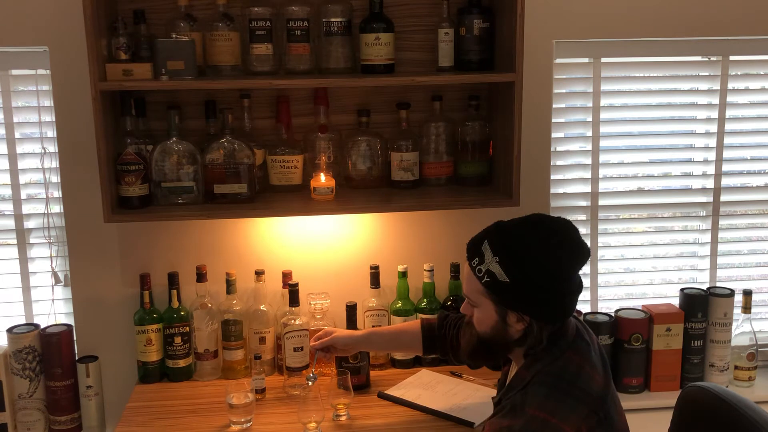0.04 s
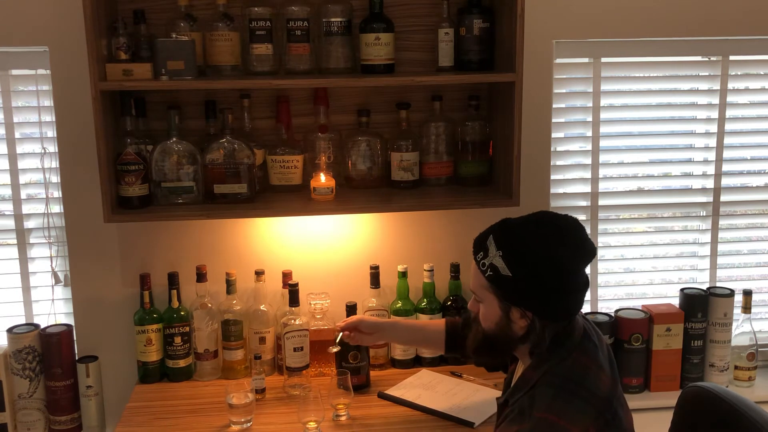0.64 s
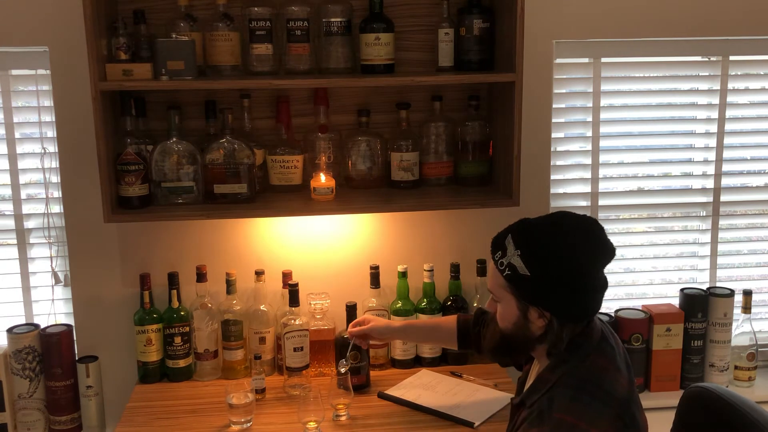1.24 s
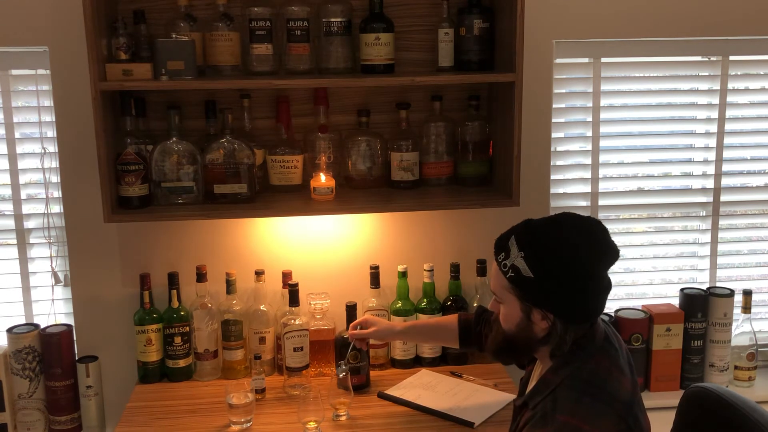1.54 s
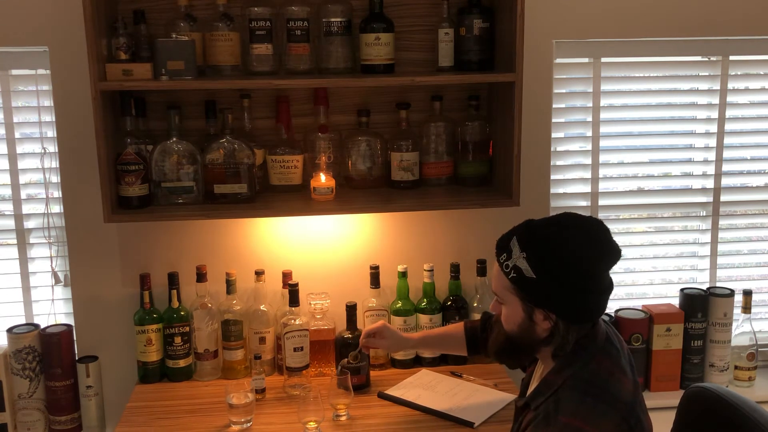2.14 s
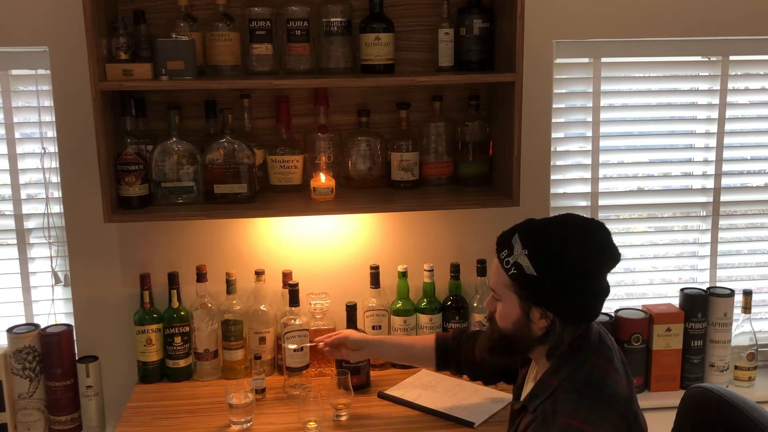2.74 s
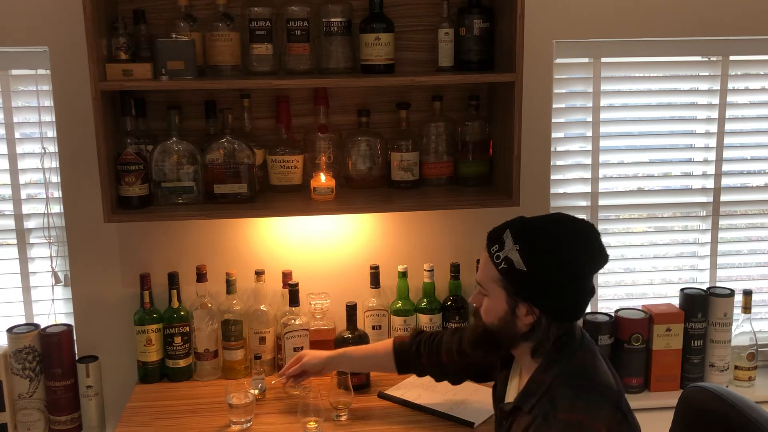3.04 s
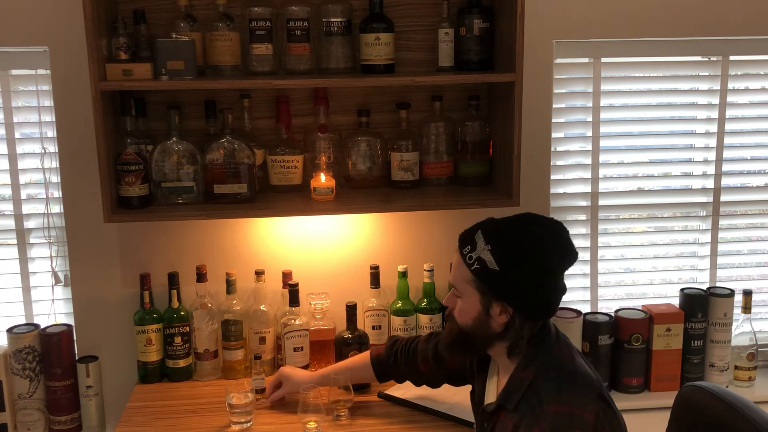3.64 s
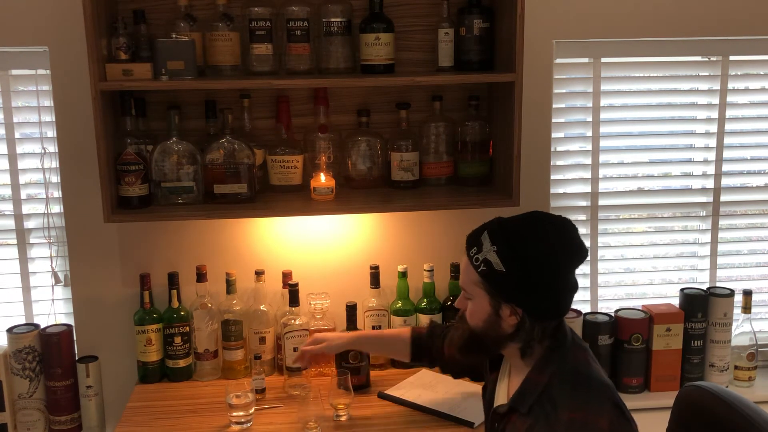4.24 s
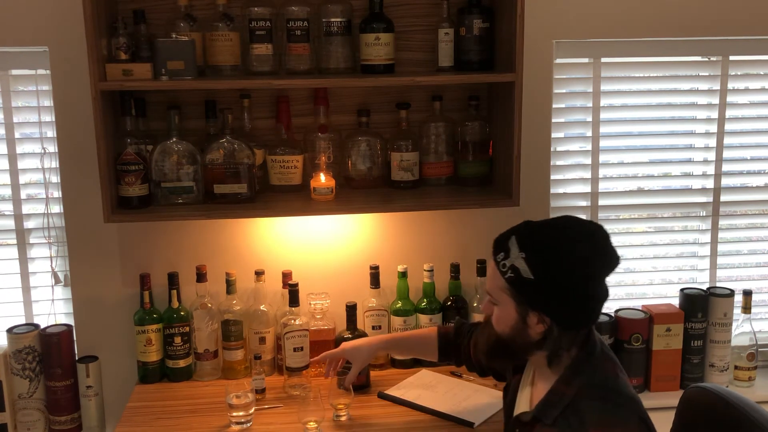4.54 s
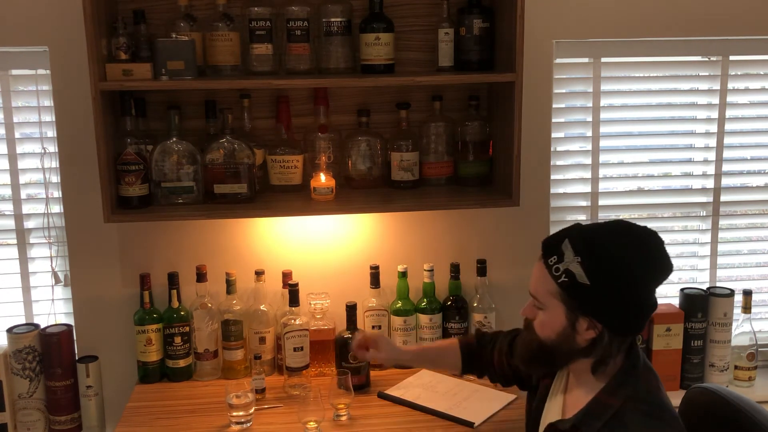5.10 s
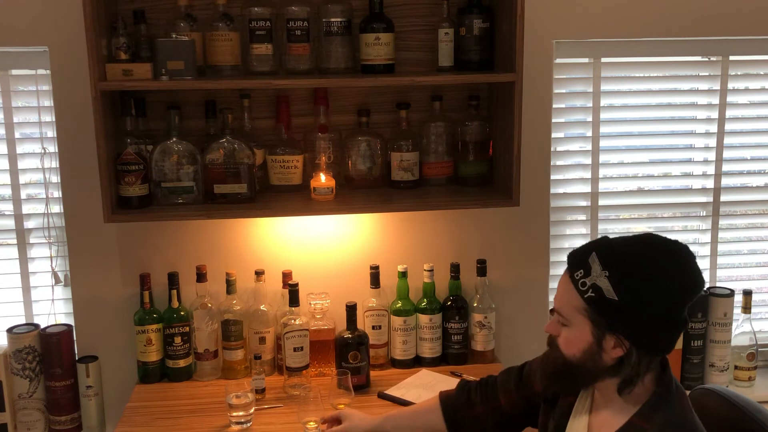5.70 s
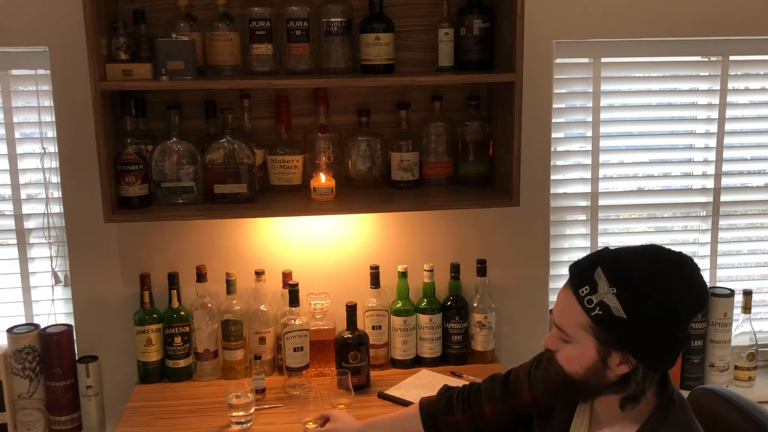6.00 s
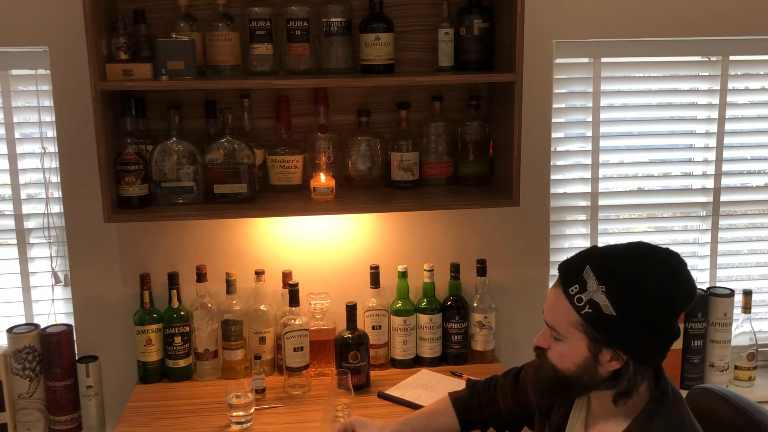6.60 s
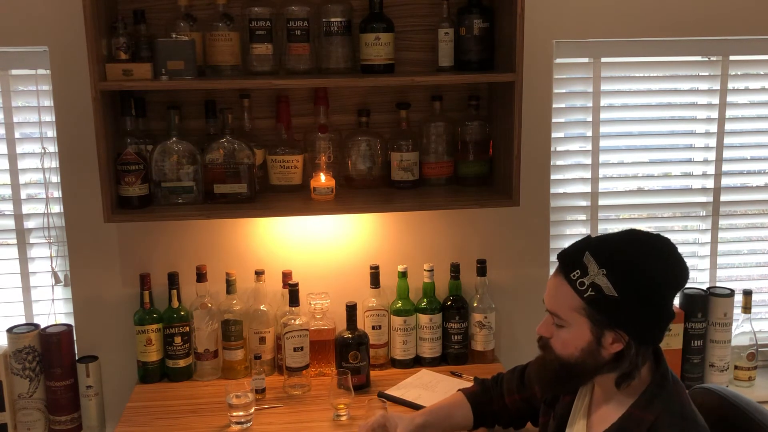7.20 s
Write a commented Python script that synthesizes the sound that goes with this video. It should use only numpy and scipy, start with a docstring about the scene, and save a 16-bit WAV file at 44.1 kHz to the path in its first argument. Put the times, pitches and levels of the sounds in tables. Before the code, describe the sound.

A few light ticks of a dropper against glass open the first 0.3 seconds, over the faint hush and low hum of a small room. At about 1.6 seconds a tasting glass clinks sharply, and its foot clacks onto a wooden table just after. Two more clinks come close together at 2.3 and 2.4 seconds, the first the strongest, leaving a clear ringing tone that gently swells and sinks as it fades. Under it the dropper is put down with two taps, at 3.4 and 4 seconds, with a brief, thin, high ring. At 4.7 seconds a hand stops the note, and glasses land with two dull clacks and wooden thuds, the second at 4.9. Further knocks follow at 5.7 and 6.5 seconds, with soft touches at 6.3 and 7.1. Everything is heard from across the table, with short room reverberation.

```python
"""Tasting glasses on a wooden table in a small, quiet room. A dropper ticks lightly, then a glass is
clinked three times and its bowl sings on in close pairs of modes. Under the long note the dropper is
put down with two taps, its thin tube ringing high. A hand closes round the glass and stops the note.
Glasses are moved and set down, their feet clacking and the wood thudding, and a few last knocks and
ticks sound over the hush of the house."""
import sys
import numpy as np
from scipy import signal
from scipy.fft import rfft, irfft
from scipy.io import wavfile

SR = 44100
rng = np.random.default_rng(int(sys.argv[2]) if len(sys.argv) > 2 else 0)


def dump_mix(stems):
    """Bounce the given channels to the path in sys.argv[1] as a 16-bit WAV at rate SR."""
    frames = np.atleast_2d(stems).T  # one column per channel
    limited = np.clip(frames, -1, 1)  # hard clip at full scale
    pcm = np.round(limited * 32767).astype(np.int16)
    wavfile.write(sys.argv[1], SR, pcm)


N = 328721
TIME = np.arange(N) / SR
BURST_TIME = TIME[:SR * 3 // 4]

# bowl of the glass, its lowest bending modes in close pairs:
# (pitch [Hz], relative level [dB], free ring t60 [s], pair member [-1 lower, +1 upper, 0 neither])
BOWL_MODES = [(1400.4, -6, 2.6, -1), (1443.1, -3, 3.7, 1), (3330, -2, 1.05, 1), (3369, -1, .85, -1),
              (5835, 0, .5, 0), (7311, 1, .24, 0), (7388, -1, .24, 0), (7530, -3, .2, 0),
              (8965, -4, .24, 0), (9043, 0, .24, 0), (10185, 0, .2, 0), (10295, -2, .24, 0),
              (2509, -20, .35, 0), (2886, -40, 2.5, 0), (4947, -9, .35, 0), (7440, 2, .07, 0),
              (8440, -16, .22, 0), (8650, -12, .24, 0), (9100, 3, .07, 0), (9600, -10, .15, 0),
              (10100, 6, .06, 0), (10910, -16, .2, 0), (11280, -14, .2, 0), (11750, -18, .2, 0),
              (12580, -11, .2, 0), (12770, -17, .2, 0), (13640, -20, .2, 0), (14100, -6, .16, 0),
              (14220, 1, .06, 0), (14370, -11, .2, 0), (15170, -15, .2, 0), (15600, -8, .13, 0)]
# points of each clink's tone curve: (frequency [Hz])
CLINK_TONE_HZ = [1420, 3350, 5830, 7400, 9500]
# touches on the rim: (time [s], five gains at CLINK_TONE_HZ [dB], lean to the upper pair member [dB],
# ring time that the fingers leave [share])
CLINKS = [(1.6143, -54, -43, -44.5, -38, -33, -3, 0.78), (2.2587, -33.5, -43, -57, -34, -39.5, 8, 0.91),
          (2.3772, -58.5, -41, -56.5, -54, -38.5, 7, 0.98), (4.9175, -76, -70.5, -77, -79, -86, 3, 0.93)]
# the long note swells and sinks: (time [s], gain [dB])
NOTE_SWELL = [(2.26, -1.9), (2.52, 1), (2.75, 1), (2.95, -1.5), (3.2, 3), (3.65, 0.5), (4.0, 1), (4.33, 3),
              (4.58, -3)]
# glass tube of the dropper: (pitch [Hz], t60 [s], first tap level [dB], second tap level [dB])
TUBE_MODES = [(6110, 0.32, -54, -55), (6670, 0.25, -59.5, -58), (8560, 0.21, -40, -62),
              (8610, 0.065, -35, -74), (11930, 0.17, -59.5, -64), (13530, 0.13, -46, -95),
              (15100, 0.099, -49, -95)]
# the dropper is put down: (time [s])
TUBE_TAPS = [3.3758, 3.9695]
# a glass foot lands: (time [s], edge thud gain [dB], rocking time [s], flat thud gain [dB],
# clack gain [dB])
LANDINGS = [(1.760, -49.5, 0.014, -45, -8.5), (4.688, -54, 0.02, -46.5, -7.5),
            (4.918, -47.5, .021, -44, -1.5)]
# tone curve of the foot's clack: (frequency [Hz], level [dB])
FOOT_TONE = [(200, -7), (550, 3), (1200, -12.5), (2400, -28), (4500, -40), (11000, -58)]
# hard contacts of glass and wood: (time [s], gain [dB], body [Hz], dull above [Hz],
# crack over tail [dB], ring pitch [Hz], thud gain [dB], bass drop [dB], treble fall [dB/octave])
KNOCKS = [(1.6157, -5, 1210, 15000, -7, 1460, -40.5, 7, 24),
          (1.6238, -4, 640, 13000, 1.5, 1020, -48, 7, 24),
          (2.2589, 1.5, 990, 12500, 1.5, 996, -34, 1.5, 21),
          (2.376, -2.5, 550, 11760, 3.5, 950, -43.5, 10, 19.5),
          (3.375, 11.5, 1170, 4130, 2.5, 923, -56, 13, 17),
          (3.969, 0.5, 1110, 4315, -7, 1580, -56, 8.5, 27), (5.6803, 1, 513, 5970, -3, 2370, -49.5, 1, 35),
          (6.5416, -4, 520, 3500, -2, 1630, -56.5, 1.5, 23)]
# wooden table top: (pitch [Hz], relative level [dB], t60 [s])
WOOD_MODES = [(121.7, -15.5, 0.42), (231.3, -12, 0.29), (360.5, -14.5, 0.44), (415, -7, 0.38),
              (552.6, -5, 0.22), (606, 3, 0.16), (653, -18.5, 0.25), (752, -3, 0.24), (844, -15.5, 0.32),
              (894, -2.5, 0.11), (1051, 3, 0.14), (1324, -9.5, 0.18)]
# light touches of dropper and fingers: (time [s], ring gain [dB], pitch [Hz], click gain [dB])
TICKS = [(0.0908, -11, 2000, -21), (.093, -14.5, 2680, -22), (.133, -19, 6420, -30),
         (.180, -19.5, 8560, -39), (.2035, -13.5, 1430, -21.5), (.263, -21.5, 2370, -46),
         (.276, -26, 8640, -40), (6.308, -7, 261, -32), (7.08, -26.5, 4220, -52)]
# reverb of the small room: (frequency [Hz], t60 [s])
ROOM_DECAY = [(150, 0.47), (400, 0.3), (1000, 0.32), (3000, 0.29), (7000, 0.28), (15000, 0.2)]
# tone curve of the room's hush: (frequency [Hz], relative density [dB])
HUSH_TONE = [(20, -31.5), (27, -20), (42, -2.5), (63, -4), (85, 12), (115, 3), (200, 1), (400, -3.5),
             (1000, -12), (2000, -18), (4500, -20), (11500, -24.5), (16000, -29)]


def glass(grip_s=4.71, grip_t60=.13):
    """The bowl sings until gripped; where the rim is touched decides which mode of a pair is louder."""
    out = np.zeros(N)
    swell = from_db(np.interp(TIME, *np.transpose(NOTE_SWELL)))
    grip = fade(np.maximum(TIME - grip_s, 0), grip_t60)
    for s, *tone_db, lean_db, ring_share in CLINKS:
        clink = np.zeros(N)
        for hz, db, t60, member in BOWL_MODES:
            gain = from_db(db + at_hz(zip(CLINK_TONE_HZ, tone_db), hz) + member * lean_db)
            add(clink, s, gain * mode(hz, t60 * ring_share, wet=0.87, rise_s=0.0015, flutter_hz=127.4))
        out += clink * (swell * grip if s < grip_s else 1)
    return out


def mode(hz, t60, wet, rise_s, flutter_hz):
    """A decaying sine; wall reflections pile up and make it flutter until the room has died away."""
    t = TIME[:int(min(1.5 * t60 + .6, 4) * SR)]
    room_t60 = at_hz(ROOM_DECAY, hz)
    knots = rng.standard_normal((1200, 2)) @ [1, 1j] / np.sqrt(2)   # random level and phase
    flutter = np.interp(t * flutter_hz, np.arange(len(knots)), knots)
    # the flutter is deepest when mode and room die equally fast
    echoes = wet * min(t60 / room_t60, room_t60 / t60) * flutter * fade(t, room_t60)
    attack = 1 - np.exp(-t / rise_s)
    return np.imag((fade(t, t60) + echoes) * attack * np.exp(2j * np.pi * hz * t))


def dropper():
    """The thin tube rings briefly and high; the softer second tap wakes mainly its lower modes."""
    out = np.zeros(N)
    for hz, t60, *levels in TUBE_MODES:
        for s, db in zip(TUBE_TAPS, levels):
            add(out, s, from_db(db) * mode(hz, t60, wet=0.4, rise_s=0.00087, flutter_hz=120))
    return out


def landings():
    """The edge of the foot thuds first; then the foot rocks flat with a second thud and a dull clack."""
    out = np.zeros(N)
    for s, edge_db, rock_s, flat_db, clack_db in LANDINGS:
        add(out, s, thud(edge_db))
        add(out, s + rock_s, thud(flat_db))
        add(out, s + rock_s, from_db(clack_db) * clack(FOOT_TONE, crack_db=0.5))
    return out


def knocks(ring_lift_db=7, boom_hz=205, boom_db=-3):
    """Each hard contact gives a clack and a short ring; the table top thuds and its frame booms."""
    out = np.zeros(N)
    for s, db, body_hz, dull_hz, crack_db, ring_hz, thud_db, bass_drop_db, fall_db in KNOCKS:
        tone = clack_tone(db, body_hz, dull_hz, bass_drop_db, fall_db)
        ring_gain = from_db(at_hz(tone, ring_hz) + ring_lift_db)
        add(out, s, clack(tone, crack_db) + ring_gain * ping(ring_hz, crack_db))
        add(out, s, thud(thud_db))
        add(out, s, from_db(db + boom_db) * ping(boom_hz, crack_db))
    return out


def thud(thud_db, reference_db=-38.5, db_per_octave=13.5, rise_cycles=2.2):
    """The low modes of the wood swell over a few cycles; a harder blow is shorter and reaches higher."""
    out = np.zeros(N)
    rolloff_hz = 1130 * 2 ** ((thud_db - reference_db) / db_per_octave)
    for k, (hz, db, t60) in enumerate(WOOD_MODES):
        ring = mode(hz, t60, wet=1.0, rise_s=rise_cycles / hz, flutter_hz=71.0) * (-1) ** k
        punch = 0.92 + fade(TIME[:len(ring)], t60=0.042)
        gain = from_db(thud_db + db) / np.hypot(1, (hz / rolloff_hz) ** 3)
        add(out, 0, gain * ring * punch)
    return out


def clack(tone, crack_db):
    """The crowded, quickly dying modes of one contact, as half-octave bands of noise."""
    edges = np.geomspace(90, 17000, 16)
    white = rng.standard_normal((len(edges), len(BURST_TIME)))
    out = np.zeros(len(BURST_TIME))
    for noise, low, high in zip(white, edges, edges[1:]):
        hz = np.sqrt(low * high)
        bandpass = signal.butter(3, [low, high], "band", fs=SR, output="sos")
        band = signal.sosfilt(bandpass, noise * crack_envelope(hz, crack_db))
        width_gain = np.sqrt(2 * (high - low) / SR / len(BURST_TIME))
        out += from_db(at_hz(tone, hz)) * rms_one(band) * width_gain
    return out


def clack_tone(db, body_hz, dull_hz, bass_drop_db, fall_db_per_octave):
    """Tone curve of a contact: size sets the body, and a slower touch dulls the top."""
    hz = np.geomspace(90, 17000, 48)
    octaves = np.log2(hz / body_hz)
    below_body_db = -bass_drop_db * np.clip(-octaves / 0.84, 0, 1)   # full drop 0.84 octaves down
    above_body_db = -3.5 * np.maximum(octaves, 0)
    treble_loss = np.hypot(1, from_db(fall_db_per_octave * np.log2(hz / dull_hz)))
    bass_loss = np.hypot(1, (150 / hz) ** 2)   # small things radiate little below 150 Hz
    return list(zip(hz, db + below_body_db + above_body_db - 20 * np.log10(treble_loss * bass_loss)))


def ping(hz, crack_db):
    """A click through one damped resonance; two passes keep its skirts dark."""
    click = rng.standard_normal(len(BURST_TIME)) * crack_envelope(hz, crack_db)
    peak = signal.iirpeak(hz, Q=10, fs=SR)
    return signal.lfilter(*peak, signal.lfilter(*peak, click))


def crack_envelope(hz, crack_db, crack_s=0.0039, lag_cycles=0.54, fill_s=0.0037):
    """A crack of a few ms, later in the bass, then the room's tail; unit energy."""
    lag = lag_cycles / hz
    t = np.maximum(BURST_TIME - lag, 0)
    crack = rms_one(t * np.exp(-2 * t / (crack_s + lag)))
    tail = rms_one((1 - np.exp(-t / (fill_s + lag))) * fade(t, at_hz(ROOM_DECAY, hz)))
    return rms_one(np.hypot(from_db(crack_db) * crack, tail)) / np.sqrt(len(BURST_TIME))


def ticks(crack_db=1):
    """Light touches of dropper and fingers: a short ring with a small click."""
    out = np.zeros(N)
    for s, ring_db, hz, click_db in TICKS:
        tone = clack_tone(click_db, body_hz=560, dull_hz=14600, bass_drop_db=16, fall_db_per_octave=24)
        add(out, s, clack(tone, crack_db) + from_db(ring_db) * ping(hz, crack_db))
    return out


def room_tone(hush_db=-68.36, drone_hz=100, drone_db=-80):
    """Steady hush of the house, with a low, wavering drone."""
    hz = np.maximum(np.fft.rfftfreq(N, 1 / SR), 1)
    hush = irfft(rfft(rng.standard_normal(N)) * from_db(at_hz(HUSH_TONE, hz)), N)
    drone = signal.lfilter(*signal.iirpeak(drone_hz, Q=27, fs=SR), rng.standard_normal(N))
    return from_db(hush_db) * rms_one(hush) + from_db(drone_db) * rms_one(drone)


def from_db(db):
    """Decibels to gain."""
    return 10 ** (np.asarray(db) / 20)


def rms_one(x):
    """Scale to an rms of one."""
    return x / np.sqrt(np.mean(np.abs(x) ** 2) + 1e-20)


def at_hz(points, hz):
    """Read a curve of (frequency [Hz], value) on a log-frequency axis."""
    f, value = np.transpose(list(points))
    return np.interp(np.log(hz), np.log(f), value)


def fade(t, t60):
    """Exponential decay, 60 dB in t60."""
    return np.exp(-np.log(1000) * t / t60)


def add(out, s, sound):
    """Mix a sound in at time s."""
    start = int(round(s * SR))
    out[start:start + len(sound)] += sound[:N - start]


def scene():
    """The mono mix, heard from across the table."""
    return (glass() + dropper() + landings() + knocks() + ticks() + room_tone())[None]


def record(dry):
    """A steep high cut at 16 kHz."""
    return signal.sosfilt(signal.ellip(10, .1, 80, 16000, fs=SR, output="sos"), dry)


dry = scene()
out = record(dry)
dump_mix(out)
```